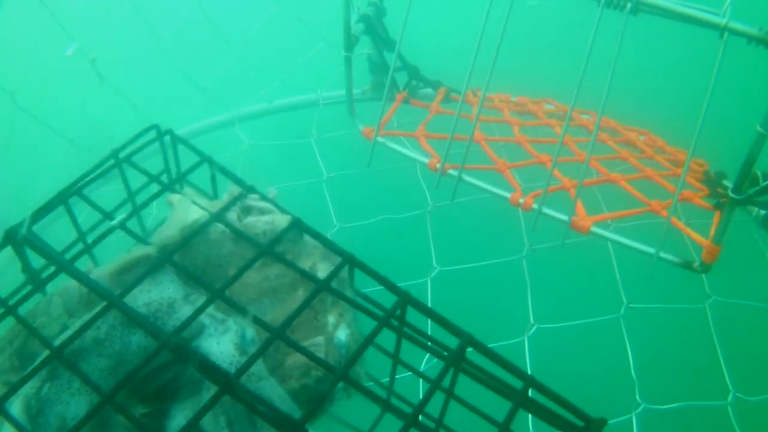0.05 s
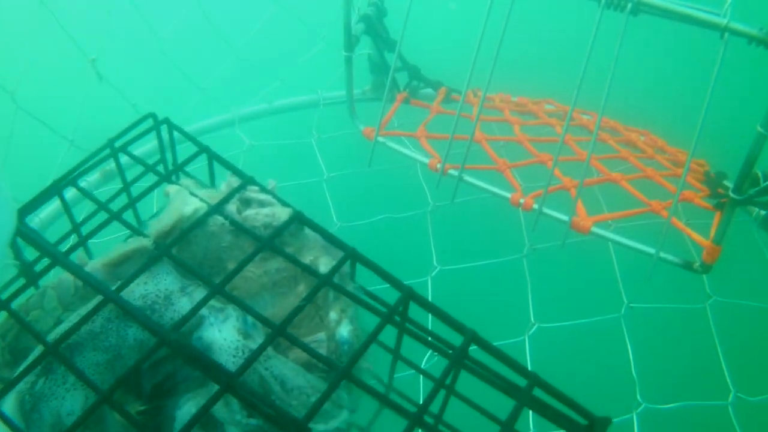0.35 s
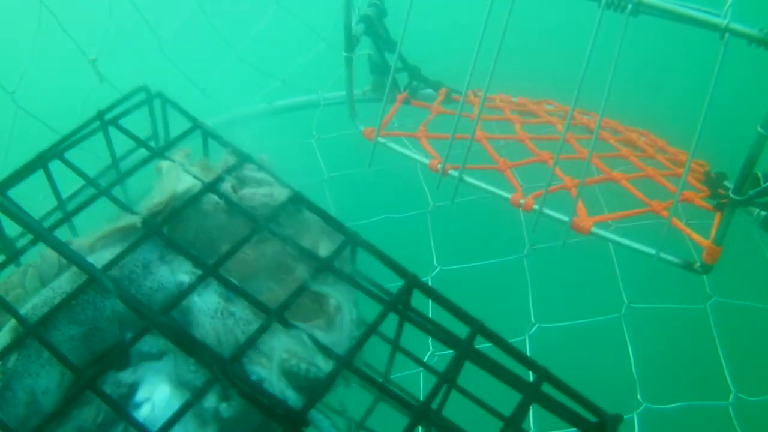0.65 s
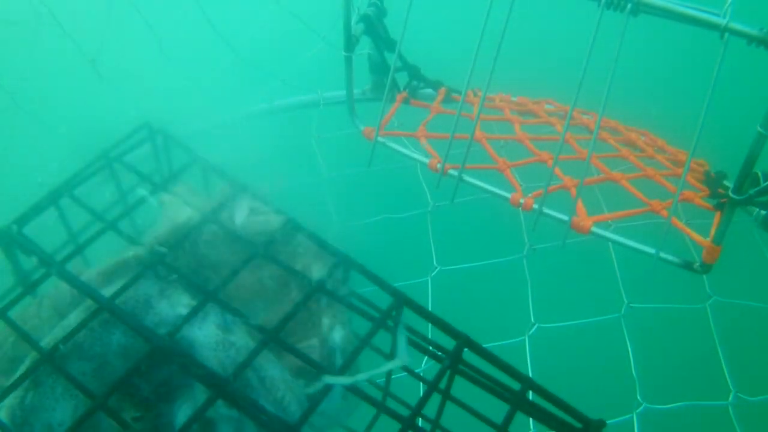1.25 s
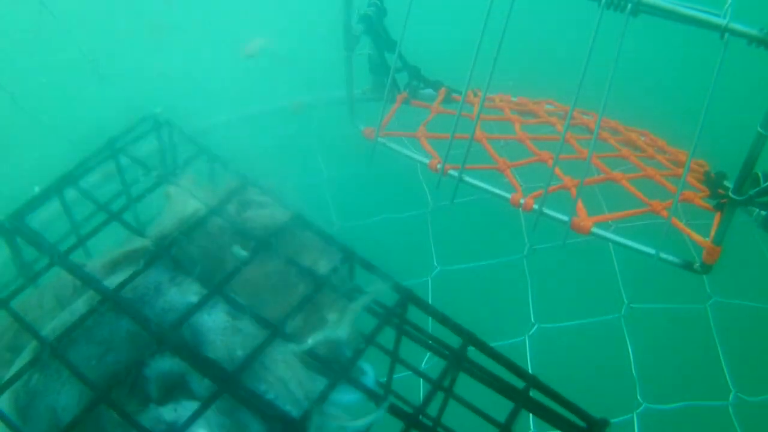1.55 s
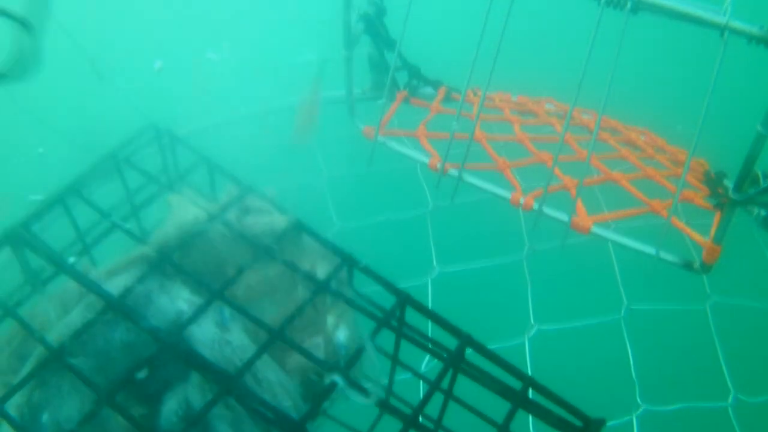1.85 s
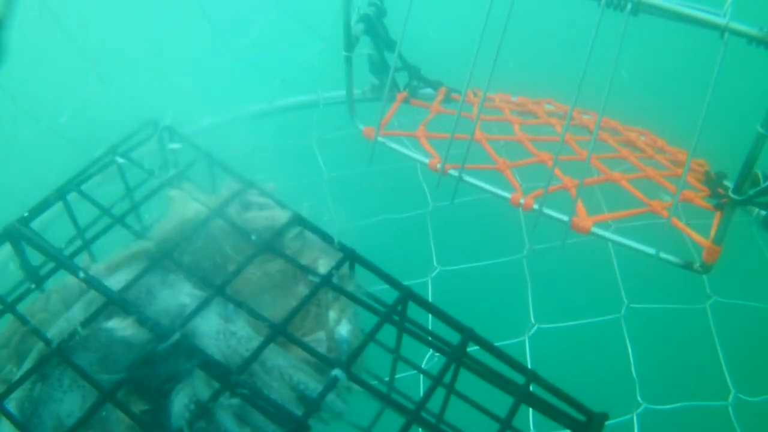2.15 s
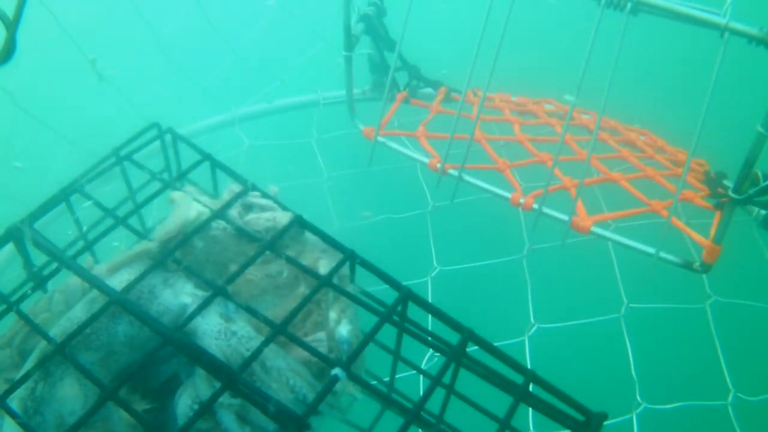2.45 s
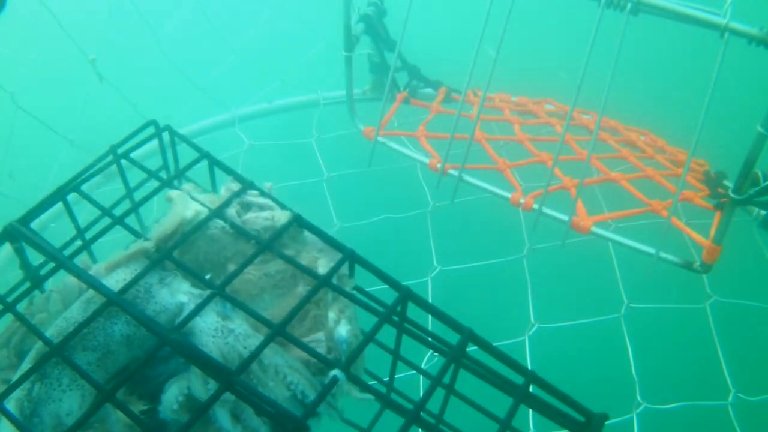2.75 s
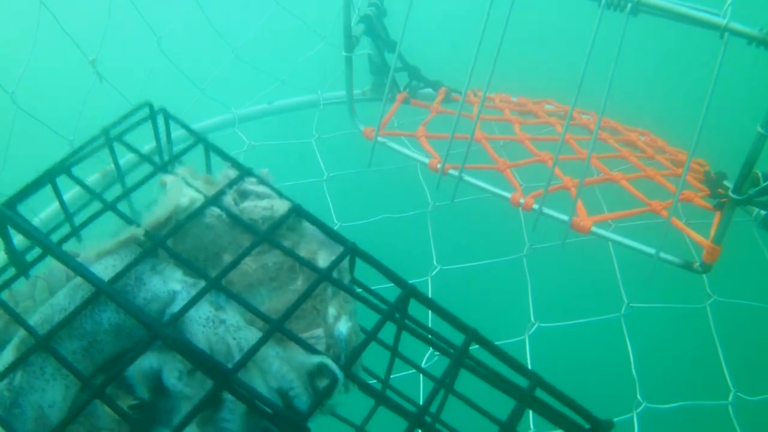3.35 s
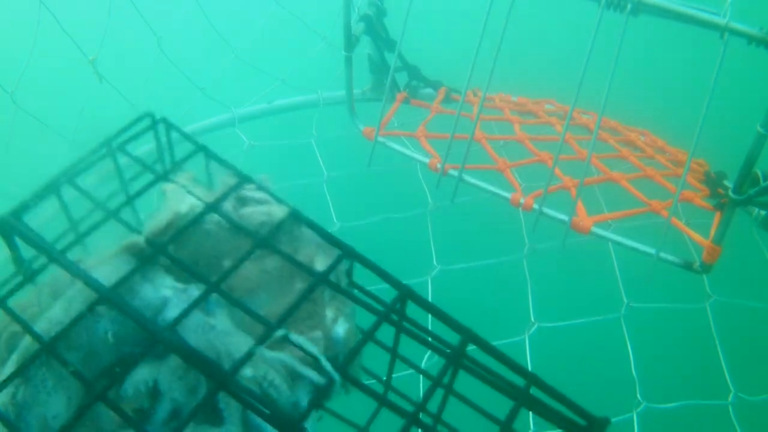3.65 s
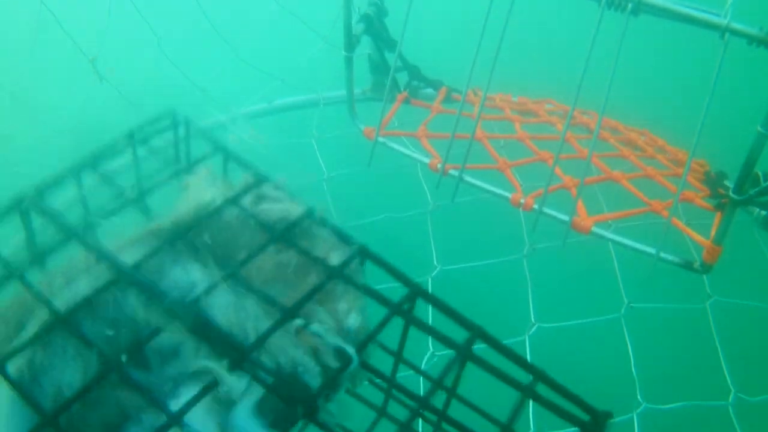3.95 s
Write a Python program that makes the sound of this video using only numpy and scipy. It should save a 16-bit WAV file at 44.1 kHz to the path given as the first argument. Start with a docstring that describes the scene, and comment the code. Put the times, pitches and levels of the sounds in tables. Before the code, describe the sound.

Low underwater rumble of moving water, with scattered bumps, clicks and small bubbles.

```python
"""Moving water rumbles and hisses around a watertight camera housing beside a baited wire trap.
Something brushes and bumps the rig: the housing shudders and knocks, low tones sag in pitch, the wire
clicks, and a scrape starts at the end. Small bubbles ring and crackle as decaying sines.
A faint, engine-like hum lies underneath. All is heard under water, almost in mono."""
import sys
import numpy as np
from scipy import signal
from scipy.fft import rfft, irfft
from scipy.io import wavfile
from scipy.ndimage import uniform_filter1d

SR = 44100
rng = np.random.default_rng(int(sys.argv[2]) if len(sys.argv) > 2 else 0)


def transcribe(u):
    """Save the signal u as a 16-bit wav file named by the first command-line argument.

    u: samples, shape (n,) or (channels, n), limited to [-1, 1]; the rate is SR.
    q: integer samples, one column per channel.
    """
    v = np.clip(np.atleast_2d(u).T, -1, 1)
    q = np.round(v * 32767).astype(np.int16)
    wavfile.write(sys.argv[1], SR, q)


N = 176400
T = np.arange(N) / SR


def from_db(db):
    """Decibels to gain."""
    return 10 ** (np.asarray(db) / 20)


def unit_rms(x):
    """Scale to unit rms."""
    return x / np.sqrt(np.mean(x ** 2) + 1e-20)


def steady(x, samples):
    """Hold the running rms at 1."""
    return x / np.sqrt(uniform_filter1d(x ** 2, samples) + 1e-9)


def level(curve):
    """Gain along a (t/s, level/dB) curve."""
    return from_db(np.interp(T, *np.transpose(curve)))


def gate(start_s, length_s, attack_s, release_s):
    """Linear attack, hold until length_s, exponential release."""
    attack = np.clip((T - start_s) / attack_s, 0, 1)
    return attack * np.exp(-np.clip((T - start_s - length_s) / release_s, 0, 30))


def add(out, start_s, sound):
    """Mix a sound in at start_s."""
    i = int(start_s * SR)
    out[i:i + len(sound)] += sound[:N - i]


def band(x, low_hz, high_hz, order=2):
    """Butterworth band-pass."""
    return signal.sosfilt(signal.butter(order, [low_hz, high_hz], "band", fs=SR, output="sos"), x + 1e-18)


def band_noise(low_hz, high_hz, order=3):
    """Band-passed white noise."""
    return band(rng.standard_normal(N), low_hz, high_hz, order)


def shaped_noise(spectrum):
    """Unit-rms noise with an (f/Hz, level/dB) spectrum, falling 12 dB/octave beyond its ends."""
    hz, db = np.transpose(spectrum)
    f = np.maximum(np.arange(N // 2 + 1) * SR / N, 1e-3)
    gain = from_db(np.interp(np.log(f), np.log(hz), db))
    skirts = np.minimum(f / hz[0], 1) ** 2 * np.minimum(hz[-1] / f, 1) ** 2
    return unit_rms(irfft(rfft(rng.standard_normal(N)) * gain * skirts, N))


def drift(rate_hz):
    """Unit-rms random wander, low-passed at rate_hz."""
    hop, settle = 40, 2000
    pole = np.exp(-2 * np.pi * rate_hz * hop / SR)
    white = rng.standard_normal(N // hop + settle + 2)
    slow = signal.lfilter([1], [1, -2 * pole, pole ** 2], white)[settle:]
    return np.interp(np.arange(N) / hop, np.arange(len(slow)), unit_rms(slow))


def ring(x, modes):
    """Decaying sines excited by x."""
    out = 0
    for hz, db, t60_s in modes:
        r, w = from_db(-60 / (t60_s * SR)), 2 * np.pi * hz / SR
        out += from_db(db) * signal.lfilter([0, np.sin(w)], [1, -2 * r * np.cos(w), r * r], x + 1e-18)
    return out


def glides(rows, fade_s, rough_db, rough_hz):
    """Fluttering tones whose pitch bends ever faster from start to end."""
    out = np.zeros(N)
    for start_s, length_s, db, start_hz, end_hz in rows:
        t = T[:int((length_s + fade_s) * SR)]
        hz = start_hz + (end_hz - start_hz) * np.minimum(t / length_s, 1) ** 1.29
        fade = np.clip(np.minimum(t, length_s + fade_s - t) / fade_s, 0, 1)
        add(out, start_s, from_db(db) * fade * np.sin(2 * np.pi * np.cumsum(hz) / SR))
    return out * unit_rms(from_db(rough_db * drift(rough_hz)))


# Water envelopes: t/s, level/dB
SURGE_LEVEL = [(0, -10), (.08, -13.5), (.22, -12.5), (.45, -14), (.55, -16), (.7, -16), (.9, -16),
               (1.25, -17.5), (1.47, -19.5), (1.8, -25), (2.06, -19.5), (2.32, -17), (2.65, -28.5),
               (3.35, -28), (3.56, -16.5), (3.8, -24), (4, -43)]
RUMBLE_LEVEL = [(0, -23), (.6, -19), (1.05, -21.5), (1.25, -20), (1.6, -20), (2.3, -20.5), (2.7, -21),
                (3.25, -20), (3.5, -20.5), (4, -18.5)]
HISS_LEVEL = [(0, -32.5), (.09, -41), (.17, -42.5), (.33, -33.5), (.53, -34), (.62, -38), (.8, -43),
              (1, -42.5), (1.12, -41.5), (1.22, -48), (1.5, -45.5), (1.76, -48), (1.85, -44.5), (2.1, -46),
              (2.55, -44.5), (2.72, -49.5), (3.12, -48.5), (3.19, -47), (3.27, -38), (3.36, -46),
              (3.48, -44.5), (3.56, -31), (3.63, -37), (3.68, -44), (3.755, -30), (3.81, -43.5),
              (3.87, -44), (4, -32)]
# Water spectra: f/Hz, density/dB
SURGE_SPECTRUM = [(7, 10.5), (18, -8.5), (35, 2), (55, -6.5), (90, -20), (200, -15.5), (500, -51)]
RUMBLE_SPECTRUM = [(20, 10), (50, -8), (80, 3), (120, -3), (180, -5), (270, -6), (450, -10.5), (560, -16.5),
                   (900, -23.5), (1400, -33), (2400, -44), (4500, -60.5), (12000, -92)]
HISS_SPECTRUM = [(600, 15), (2000, 3), (4500, -2), (7000, -0.5), (9500, 1.5), (12000, -4.5), (15500, -11)]


def water():
    """Water moves over the housing: slow surge, steady rumble, grainy hiss."""
    surge = level(SURGE_LEVEL) * steady(shaped_noise(SURGE_SPECTRUM), samples=6000)
    rumble = level(RUMBLE_LEVEL) * steady(shaped_noise(RUMBLE_SPECTRUM), samples=8000)
    hiss = shaped_noise(HISS_SPECTRUM) * from_db(2 * drift(rate_hz=145) + 0.46 * drift(rate_hz=11))
    return surge + rumble + level(HISS_LEVEL) * unit_rms(hiss)


# Pressure swings: centre t/s, level/dB, f/Hz
WATER_SHOVES = [(0.363, -4.5, 22.8), (0.609, -3, 26.6), (1.365, -5, 31), (2.035, -8, 69.5), (3.596, -9, 98),
                (3.773, 0, 104)]


def shoves():
    """The water presses once and lets go."""
    out = np.zeros(N)
    for centre_s, db, hz in WATER_SHOVES:
        cycles = hz * (T - centre_s)
        out += from_db(db) * np.sin(2 * np.pi * cycles) * np.exp(-np.minimum(2 * cycles ** 2, 50))
    return out


# Housing shudder: f/Hz, density/dB
SHUDDER_SPECTRUM = [(25, -39), (55, -9), (78, 2), (110, -1.5), (170, -1), (260, -12.5), (350, -22.5),
                    (560, -21), (1200, -44), (6000, -57)]
# Rubs: t/s, length/s, shudder/dB, hollow ring/dB, grit/dB
HOUSING_RUBS = [(0.055, 0.043, -15.5, -29, -42), (0.485, 0.18, -40, -28.5, -54),
                (0.693, 0.03, -22.5, -30, -63), (1.166, 0.12, -23, -27.5, -52),
                (1.821, 0.072, -17, -46, -58), (2.026, 0.059, -19, -53, -61),
                (3.393, 0.12, -17.5, -30, -59), (3.513, 0.08, -11, -24.5, -42),
                (3.609, 0.073, -20, -25, -38.5), (3.711, 0.046, -14.5, -37, -33),
                (3.762, 0.042, -14, -24, -57), (3.921, 0.084, -21, -28, -34.5)]


def rubs():
    """Soft contacts make the housing shudder, ring hollowly and grate."""
    shudder = steady(shaped_noise(SHUDDER_SPECTRUM), samples=1500)
    hollow = steady(band_noise(321, 468), samples=2000)
    grit = unit_rms(band_noise(695, 1920, order=2) * from_db(4 * drift(rate_hz=140)))
    out = np.zeros(N)
    for start_s, length_s, shudder_db, hollow_db, grit_db in HOUSING_RUBS:
        rub = from_db(shudder_db) * shudder + from_db(hollow_db) * hollow + from_db(grit_db) * grit
        out += gate(start_s, length_s, attack_s=0.0075, release_s=0.0031) * rub
    return out


# Blows on the housing: t/s, level/dB
HOUSING_KNOCKS = [(0.497, -32), (0.557, -18), (.606, -12), (0.063, -20.5), (3.71, -19), (3.766, -17),
                  (3.775, -12)]
# Housing modes: f/Hz, level/dB, t60/s
HOUSING_MODES = [(81, -19, 0.22), (143, 1, 0.098), (368, -15, 0.059), (451, 2, 0.1), (597, -17, 0.02)]


def knocks():
    """Each blow strikes the housing's modes with slightly different strengths."""
    out = np.zeros(N)
    for mode in HOUSING_MODES:
        blows = np.zeros(N)
        for start_s, db in HOUSING_KNOCKS:
            add(blows, start_s, from_db(db + 0.5 * rng.standard_normal(1)))
        out += ring(blows, [mode])
    return out


# Low tones: t/s, length/s, level/dB, start f/Hz, end f/Hz
LOW_TONES = [(3.522, 0.089, -10.5, 190, 138.6), (3.79, 0.185, -14.5, 79.2, 75.5)]


def low_tones():
    """Low tones sag in pitch: a short groan, then a deep ringing after a knock."""
    return glides(LOW_TONES, fade_s=0.0059, rough_db=1, rough_hz=39.8)


# Clicks: t/s, low/dB, mid/dB, high/dB, decay/s
WIRE_CLICKS = [(0.053, -22, -9, -30, 0.0018), (0.0573, -25, -15.5, -20.5, 0.0036),
               (0.331, -24.5, -24, -36, 0.00047), (0.3381, -37, -28.5, -25, 0.003),
               (0.388, -42, -20, -40, 0.002), (0.396, -29, -22.5, -34, 0.0051),
               (0.4251, -28.5, -20.5, -21, 0.0034), (0.4817, -16, -29, -17.5, 0.0017),
               (0.497, -20, -31, -24, 0.0019), (0.5579, -17, -29, -25.5, 0.0035),
               (0.564, -34, -19.5, -26, 0.0032), (0.6766, -25, -33, -29, 0.0012),
               (0.715, -40, -46, -33, 0.0021), (0.958, -33, -52, -32.5, 0.0021),
               (1.9541, -26.5, -21, -32, 0.0024), (2.021, -54, -53, -38, 0.0075),
               (2.309, -44, -33, -32, 0.0013), (2.3202, -42, -31, -27.5, 0.0017),
               (2.3302, -32, -23, -43, 0.0027), (2.519, -43, -29, -44, 0.0027),
               (2.6486, -52, -39, -33, 0.0037), (3.6217, -33, -28, -21.5, 0.005),
               (3.761, -27, -33, -21.5, 0.0032), (3.776, -37, -23, -47, 0.0011),
               (3.88, -27, -23.5, -35, 0.0015), (3.9154, -28, -25, -27, .0026),
               (3.9644, -24, -23, -36, 0.0094)]
# Wire modes: f/Hz, level/dB, t60/s
WIRE_MODES = [(1645, -14, 0.043), (2680, -29, 0.058), (2890, 1, 0.065), (3370, -1, 0.014),
              (4015, -13, 0.039), (4050, 2, 0.018), (6300, -23, .035), (7200, -2, 0.034)]


def clicks(rise_s=0.00009, low_linger=2.5, ring_db=-39.5):
    """Brief three-band snaps leave the wire ringing."""
    low, mid, high = np.zeros((3, N))
    for start_s, low_db, mid_db, high_db, decay_s in WIRE_CLICKS:
        decay_s = max(decay_s, 0.0005)
        snap = gate(start_s, rise_s, rise_s, decay_s)
        low += from_db(low_db) * gate(start_s, rise_s, rise_s, decay_s * low_linger)
        mid += from_db(mid_db) * snap
        high += from_db(high_db) * snap
    snaps = low * steady(band_noise(406, 1600), samples=200)
    snaps += mid * steady(band_noise(2190, 5060, order=4), samples=100)
    snaps += high * unit_rms(band_noise(6060, 11600))
    return snaps + from_db(ring_db) * ring(snaps, WIRE_MODES)


# Scrape envelope: t/s, level/dB
SCRAPE_LEVEL = [(3.87, -73), (3.9, -44), (3.95, -40), (3.98, -22.5), (4, -35)]


def scrape(slips_per_s=890, ring_db=-30):
    """Dense slips along the wire excite its modes."""
    slips = (rng.random(N) < slips_per_s / SR) * rng.standard_normal(N)
    grit = band(slips, 500, 6200)
    ringing = from_db(ring_db) * ring(grit, WIRE_MODES)
    started = T > SCRAPE_LEVEL[0][0]
    return started * level(SCRAPE_LEVEL) * steady(grit + ringing, samples=900)


# Blow on the frame: t/s, level/dB
FRAME_BLOW = (2.2118, -22.5)
# Frame bands: low f/Hz, high f/Hz, level/dB, decay/s
FRAME_BANDS = [(570, 930, -2.5, 0.027), (1250, 1650, -1.5, .011), (1870, 2460, -9, 0.014),
               (2900, 4250, -5, 0.0033)]


def clunk(rise_s=0.0011):
    """A dull blow on the frame; the lowest band rings longest."""
    start_s, db = FRAME_BLOW
    out = np.zeros(N)
    for low_hz, high_hz, band_db, decay_s in FRAME_BANDS:
        envelope = from_db(db + band_db) * gate(start_s, rise_s, rise_s, decay_s)
        out += envelope * steady(band_noise(low_hz, high_hz), samples=400)
    return out


def ping(hz, t60_s, attack_s, rise_per_s):
    """One bubble: a decaying sine with a linear pitch slide."""
    t = T[:int(t60_s * SR) + 2]
    envelope = np.minimum(t / attack_s, 1) * from_db(-60 * t / t60_s)
    return envelope * np.sin(2 * np.pi * hz * t * (1 + rise_per_s * t / 2))


# Bubbles: t/s, level/dB, f/Hz, t60/s, relative pitch rise/(1/s)
SINGLE_BUBBLES = [(.061, -13, 703, 0.049, -3), (.388, -13.5, 726, 0.077, 8.5), (.411, -12, 2020, 0.011, 7),
                  (.427, -28, 2600, 0.035, 4), (0.496, -20, 1430, 0.046, 9), (0.514, -22.5, 3430, 0.025, 6),
                  (.562, -6, 1250, 0.014, 8), (.589, -17.5, 3030, 0.011, 1), (0.611, -22, 4040, 0.011, 7),
                  (0.681, -20.5, 1110, 0.038, 1), (.714, -28, 2850, 0.023, 3), (0.654, -30, 2380, .025, -1),
                  (.755, -31, 2250, .035, 4), (0.825, -34, 2420, 0.03, 12), (.868, -33.5, 4350, 0.028, -10),
                  (.482, -12.5, 990, 0.027, -1), (.499, -13, 600, 0.021, -3), (0.402, -15, 1770, .014, 4),
                  (1.841, -28, 2550, 0.018, 9), (1.864, -28.5, 1290, 0.053, 0), (2.333, -26, 4060, .018, 2),
                  (2.344, -21, 6750, .008, 0), (2.351, -22, 3900, .009, 3), (2.277, -28, 4700, 0.0064, 0),
                  (2.314, -19, 3400, 0.0087, 1), (2.333, -17.5, 2070, 0.019, 11),
                  (1.513, -40, 4900, .018, -3), (2.261, -33, 5340, 0.012, -3),
                  (2.535, -14, 5400, 0.0028, 42)]


def bubbles(attack_s=0.0004):
    """Single bubbles ring, each at its own pitch."""
    out = np.zeros(N)
    for start_s, db, hz, t60_s, rise_per_s in SINGLE_BUBBLES:
        add(out, start_s, from_db(db) * ping(hz, t60_s, attack_s, rise_per_s))
    return out


# Clouds: t/s, length/s, weakest bubble/dB, centre f/Hz
BUBBLE_CLOUDS = [(0.057, 0.029, -42.5, 5150), (0.369, 0.29, -44.5, 2600), (0.381, 0.27, -44.5, 1214),
                 (0.671, 0.22, -50, 2290), (.58, 0.32, -46.5, 5800), (2.334, .06, -43, 6360),
                 (2.336, 0.06, -47.5, 2640), (2.397, .14, -48, 4070), (2.582, 0.18, -55, 3360)]


def crackles(per_cloud=130, spread_oct=0.74, range_db=21, t60_cycles=26.2):
    """Clouds of tiny bubbles ring at random pitches, most of them weakly."""
    out = np.zeros(N)
    for start_s, length_s, db, centre_hz in BUBBLE_CLOUDS:
        for when, pitch, strength in rng.random((per_cloud, 3)):
            hz = centre_hz * 2 ** (spread_oct * (2 * pitch - 1))
            t60_s = t60_cycles / hz
            bubble = ping(hz, t60_s, attack_s=2 / hz, rise_per_s=0.3 / t60_s)
            add(out, start_s + when * length_s, from_db(db + range_db * strength ** 3) * bubble)
    return out


# Long bubbles: t/s, length/s, level/dB, start f/Hz, end f/Hz
BUBBLE_GLIDES = [(.505, 0.041, -36, 1216, 1760), (.688, .028, -37, 1070, 1750),
                 (.807, 0.0224, -33.5, 2225, 1820), (.894, 0.037, -34.5, 1036, 1660)]


def long_bubbles():
    """Bubbles glide, mostly upward, as they near the surface."""
    return glides(BUBBLE_GLIDES, fade_s=0.0053, rough_db=1.8, rough_hz=130)


# Prickle envelope: t/s, level/dB
PRICKLE_LEVEL = [(0, -61), (.2, -50.5), (.35, -42.5), (.7, -50.5), (1, -53.5), (1.2, -75), (4, -64)]


def prickles(ticks_per_s=260, decay_s=0.001):
    """Tiny ticks of very uneven strength prickle in the bubbling water."""
    ticks = (rng.random(N) < ticks_per_s / SR) * from_db(9 * np.minimum(rng.exponential(1, N), 3))
    envelope = signal.lfilter([1], [1, -np.exp(-1 / (decay_s * SR))], ticks + 1e-18)
    return level(PRICKLE_LEVEL) * unit_rms(band(envelope * rng.standard_normal(N), 2900, 11000))


# Swishes: t/s, length/s, level/dB, low f/Hz, high f/Hz
RIG_SWISHES = [(1.027, 0.038, -40, 7600, 11600), (2.91, 0.13, -54, 2870, 3850)]


def swishes():
    """Faint brushes along the rig give narrow bands of noise."""
    out = np.zeros(N)
    for start_s, length_s, db, low_hz, high_hz in RIG_SWISHES:
        envelope = from_db(db) * gate(start_s, length_s, attack_s=0.032, release_s=0.022)
        out += envelope * unit_rms(band_noise(low_hz, high_hz))
    return out


# Hum tones: f/Hz, rms level/dB
HUM_TONES = [(105.1, -25.5), (144.6, -32.5), (76.5, -42.5)]


def hum(waver_db=1, wander_hz=1.65):
    """Low, engine-like tones waver in level and pitch."""
    out = np.zeros(N)
    for hz, db in HUM_TONES:
        amplitude = np.sqrt(2) * from_db(db + waver_db * drift(rate_hz=6.2))
        pitch_hz = hz + wander_hz * drift(rate_hz=3)
        out += amplitude * np.sin(2 * np.pi * np.cumsum(pitch_hz) / SR)
    return out


def scene(mismatch_db=-18.5, mismatch_hz=3.5, self_noise_db=-92):
    """Two microphones in the housing differ only in the deepest bass and their self-noise."""
    mono = water() + shoves()
    mono += rubs() + knocks() + low_tones() + clicks() + scrape() + clunk()
    mono += bubbles() + crackles() + long_bubbles() + prickles() + swishes() + hum()
    side = from_db(mismatch_db) * signal.lfilter(*signal.butter(1, mismatch_hz, fs=SR), mono)
    return np.array([mono + side, mono - side]) + from_db(self_noise_db) * rng.standard_normal((2, N))


def record(dry, cutoff_hz=15700):
    """Clip at full scale, then low-pass steeply."""
    return signal.sosfilt(signal.ellip(10, .2, 70, cutoff_hz, fs=SR, output="sos"), np.clip(dry, -1, 1))


dry = scene()
out = record(dry)
transcribe(out)
```